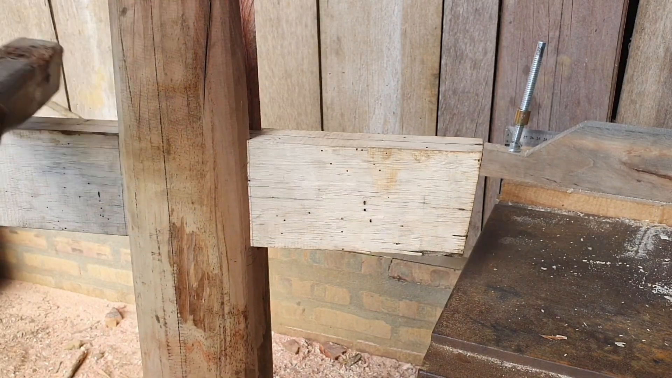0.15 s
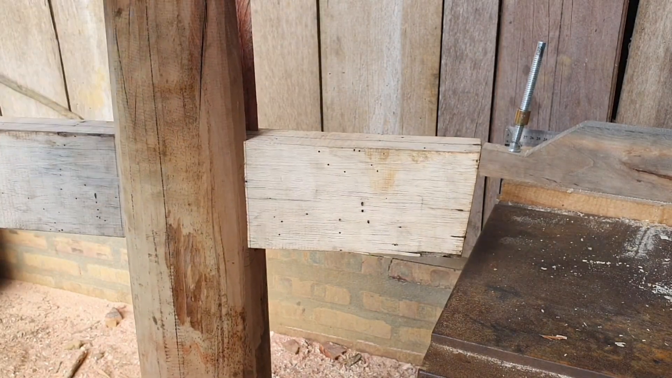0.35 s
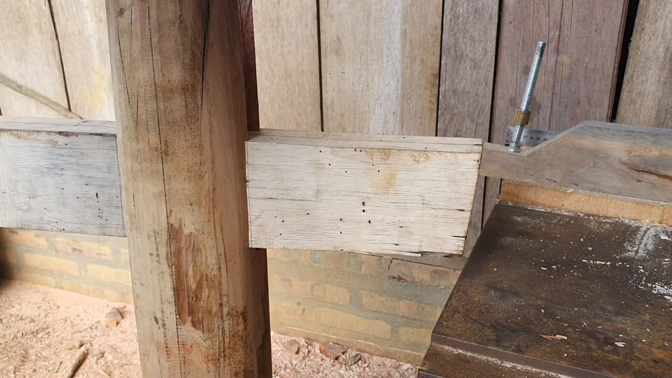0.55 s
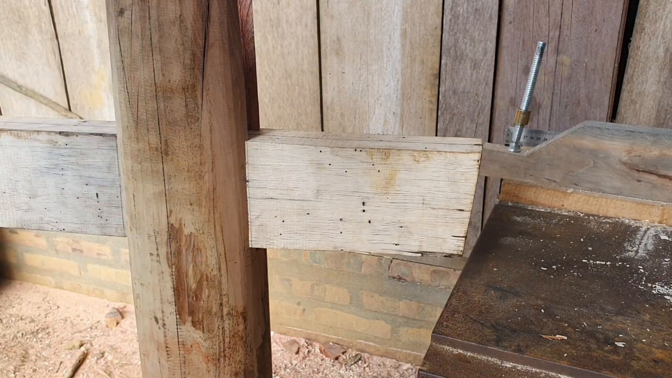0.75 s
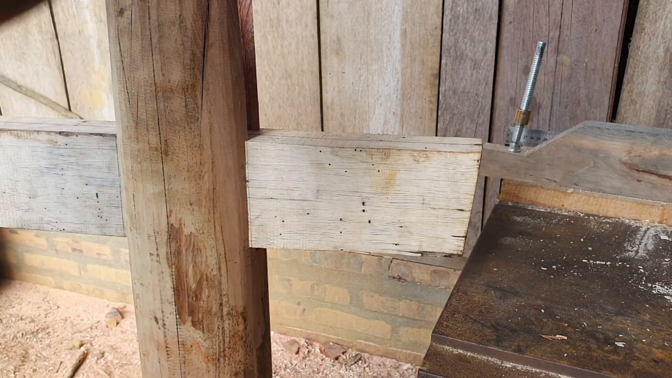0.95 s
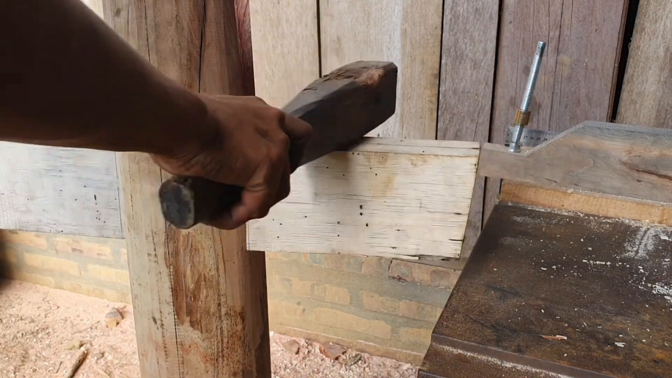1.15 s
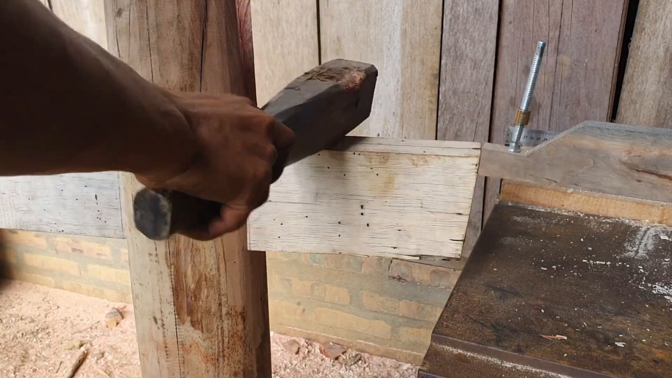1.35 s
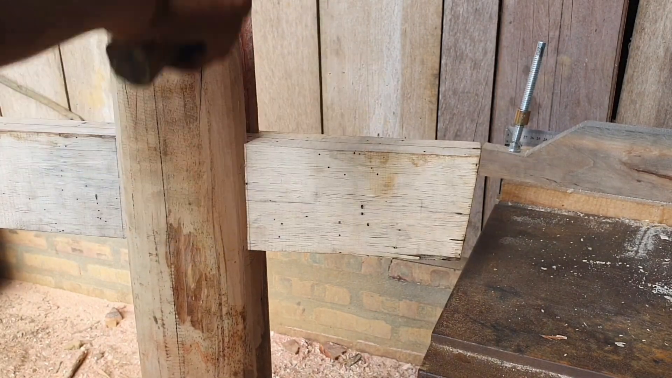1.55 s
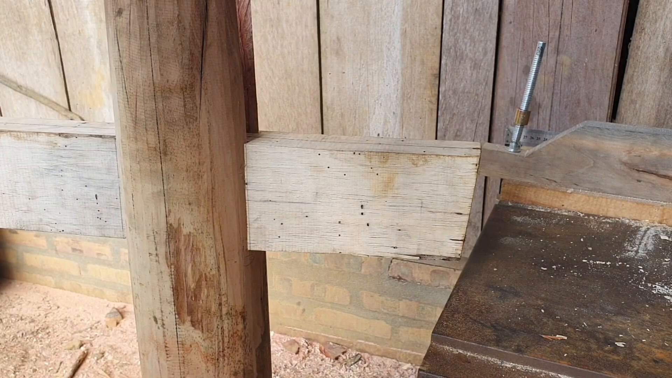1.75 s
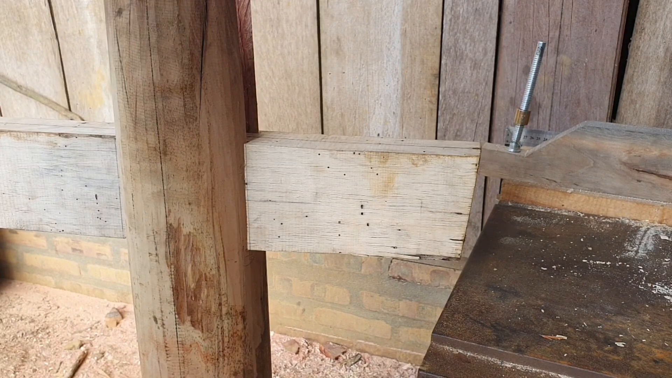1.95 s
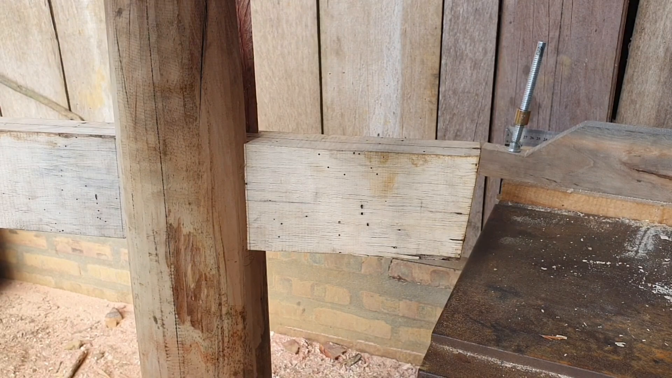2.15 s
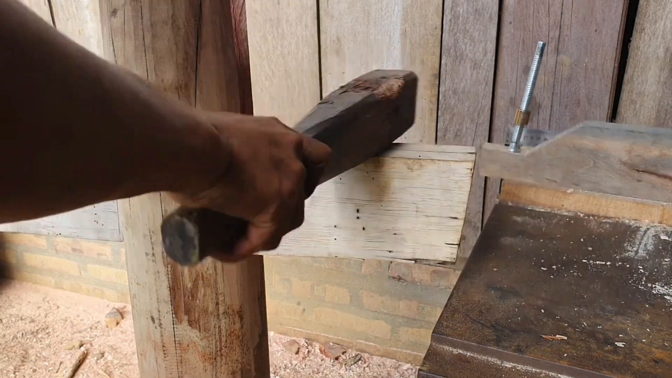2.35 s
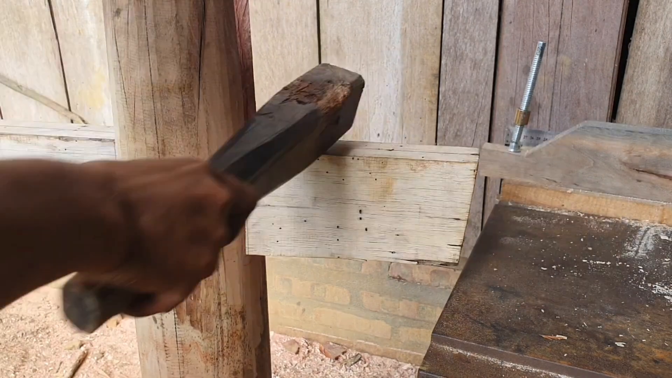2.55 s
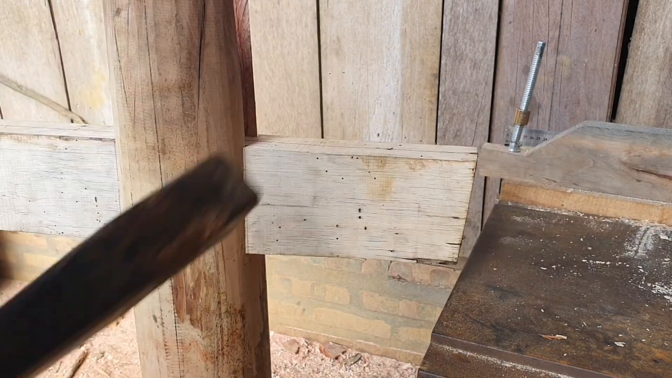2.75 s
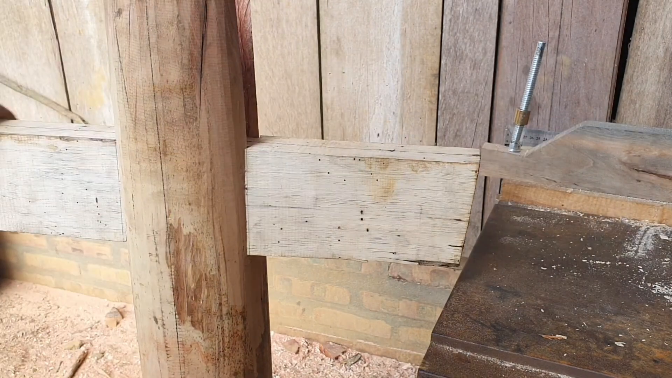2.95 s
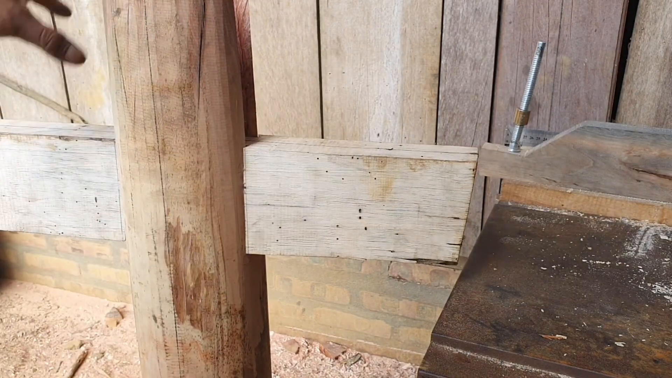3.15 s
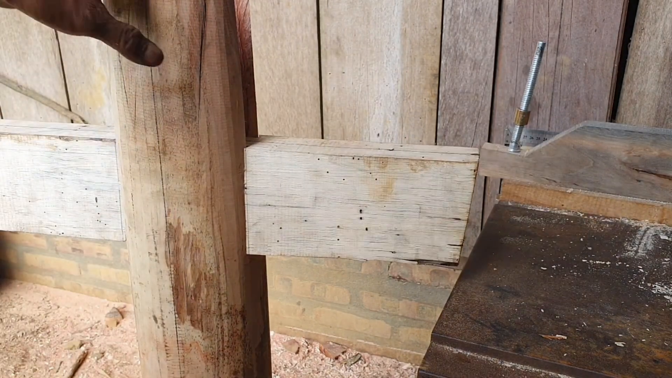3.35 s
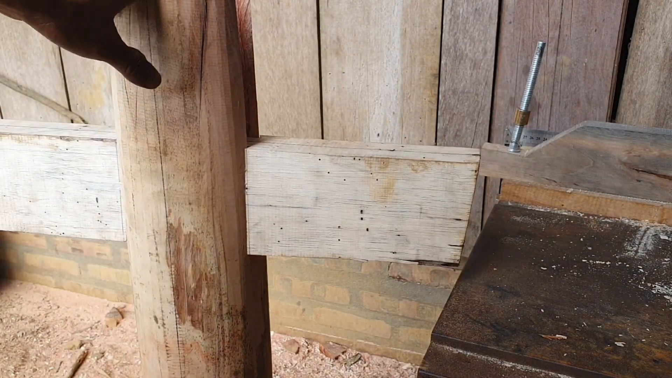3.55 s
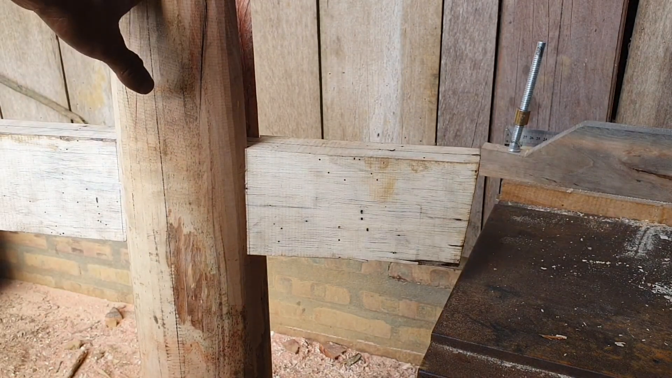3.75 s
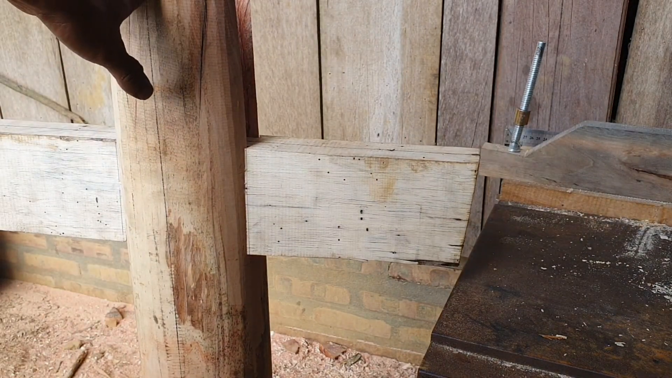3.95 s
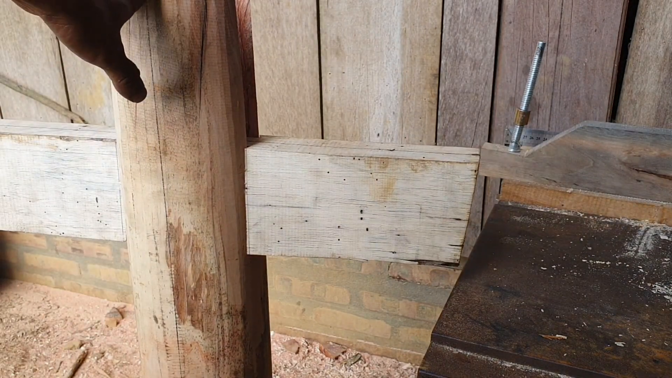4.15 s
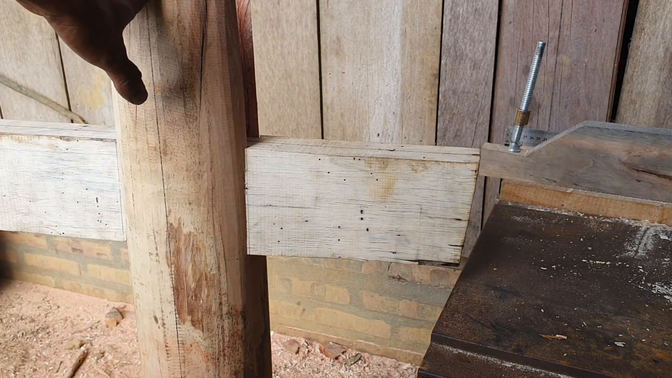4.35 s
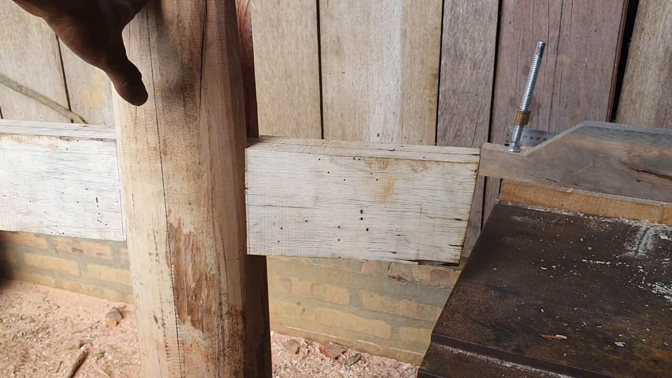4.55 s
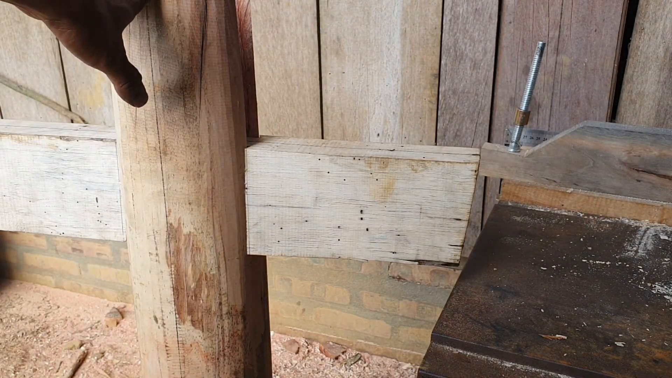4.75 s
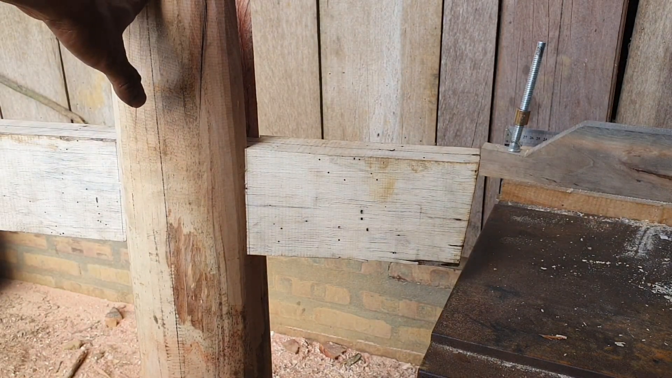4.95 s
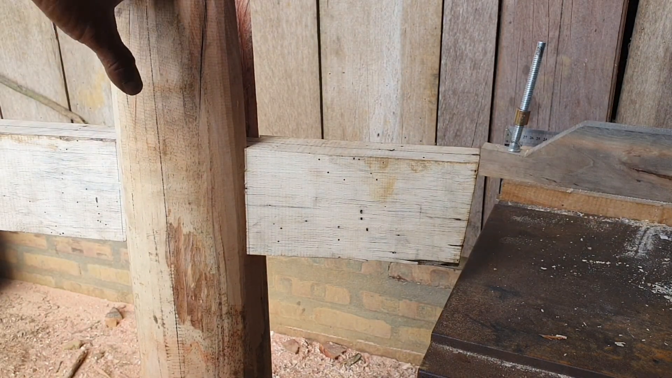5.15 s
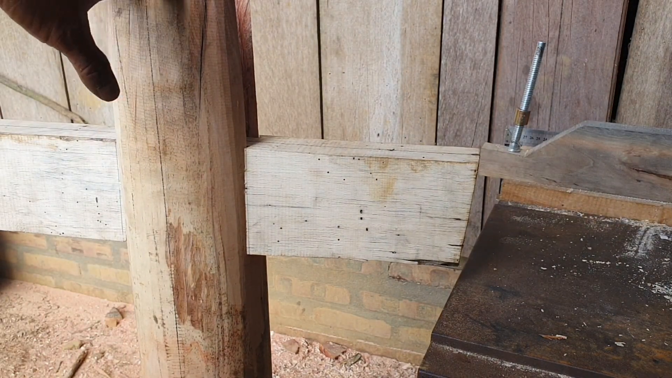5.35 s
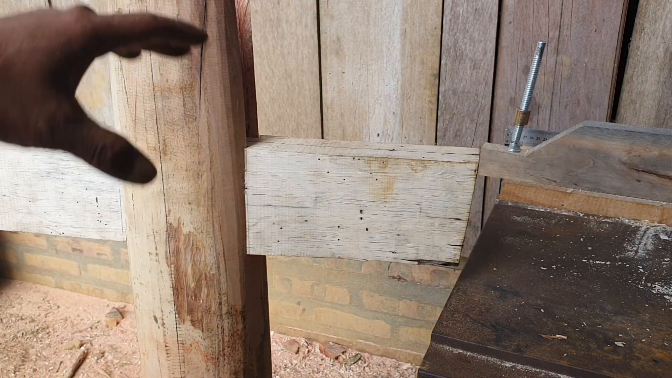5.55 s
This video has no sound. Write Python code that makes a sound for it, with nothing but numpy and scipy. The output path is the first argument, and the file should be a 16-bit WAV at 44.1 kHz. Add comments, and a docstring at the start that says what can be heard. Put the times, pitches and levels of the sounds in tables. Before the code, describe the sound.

Three loud wood-on-wood knocks, the first more hollow and lower, the next two brighter and harder, land a little over a second apart. A plank wall hums low beneath them and slowly dies away. Then only a brief scrape and faint dull bumps from the worker remain, over soft open air, a barely audible insect and distant chirping birds, in stereo at close range.

```python
"""A wooden mallet drives a notched beam onto a post: three hard blows, one left of the post, two right of it.
Each blow sums ringing beam modes, a mallet clack and a contact pulse, then gets the work shed's echoes.
The plank wall shudders in slow beating modes, also from an earlier blow; the loose beam rebounds softly.
Shaped noise makes the scuffs and bumps of the worker shifting about and taking hold of the post.
Behind are distant bird chirps (gliding sines), a far insect (pulsed band noise) and open-air noise."""
import sys
import numpy as np
from scipy import signal
from scipy.fft import rfft, irfft
from scipy.io import wavfile

SR = 44100
rng = np.random.default_rng(int(sys.argv[2]) if len(sys.argv) > 2 else 0)


def materialize(psi):
    """Save the field psi as 16-bit PCM at rate SR to the path in sys.argv[1].

    A 1-D psi becomes a single channel; in a 2-D psi each row is a channel.
    """
    bounded = np.clip(np.atleast_2d(psi).T, -1, 1)
    quanta = np.round(bounded * 32767).astype(np.int16)
    wavfile.write(sys.argv[1], SR, quanta)


N = 246519

# Open-air spectrum. Each row: frequency in Hz, relative density in dB per Hz.
AIR_SPECTRUM = [(20, -16.5), (50, -2.5), (72, -1), (110, -12), (170, -16), (400, -23.5), (560, -21.5),
                (1100, -29), (1800, -34.5), (3200, -34.5), (4200, -37), (7200, -39.5), (8300, -57),
                (12000, -52.5), (15500, -53.5)]
# Bird chirps. Each row: start in seconds, nominal top pitch in Hz, relative level in dB.
BIRD_CHIRPS = [(0.44, 4100, -64), (1.54, 4390, -61), (1.85, 3500, -60.5), (1.952, 3710, -61.5),
               (2.11, 3926, -56.5), (2.755, 4190, -65), (3.89, 4245, -58.5), (4.51, 4350, -59),
               (4.547, 3410, -61.5), (4.66, 3620, -63), (4.772, 4390, -56.5), (5.045, 3750, -61.5),
               (5.2, 3350, -66.5), (5.422, 4330, -56)]
# Worker's scuffs and bumps. Each row: start in seconds, time before dying away in seconds, level in dB,
# weight from 0 (light scrape) to 1 (dull bump).
WORKER_SCUFFS = [(1.128, .06, -57.5, 0.068), (2.216, .15, -64, .26), (3.066, .08, -64, .2),
                 (3.297, 0.051, -47, .19), (3.33, .17, -53, 0.69), (4.0, .2, -68, 0.57),
                 (4.189, .045, -61.5, 0.46), (4.733, 0.12, -62, .54), (4.87, .09, -61, 0.94),
                 (5.016, .075, -55.5, 1), (5.4, 0.17, -65, .31)]
# Light scrape spectrum. Each row: frequency in Hz, relative density in dB per Hz.
SCRAPE_SPECTRUM = [(60, -14), (250, 4), (600, 2.5), (900, 0), (1600, -2), (3500, -6), (6000, -21.5),
                   (9000, -28.5), (15000, -27.5)]
# Dull bump spectrum. Each row: frequency in Hz, relative density in dB per Hz.
BUMP_SPECTRUM = [(40, -10), (90, 1), (145, 7), (230, 2), (340, 0), (520, -13), (1200, -31), (4000, -41.5),
                 (15000, -57.5)]
# Plank wall and frame modes. Each row: nominal frequency in Hz, T60 in seconds, relative level in dB.
WALL_MODES = [(47.2, 1.1, -3.5), (55.3, 0.7, -2.5), (61.5, 0.3, 0), (70.2, .6, 10.5), (74.5, 0.27, -5.5),
              (54.6, 3.6, -13.5), (64.7, 7, -20.5), (69.8, 5.7, -19.5)]
# Loose beam rebounding in its notch. Each row: start in seconds, pitch in Hz, T60 in seconds, level in dB.
BEAM_REBOUNDS = [(.128, 344, 0.32, -35.5), (1.238, 431, 0.14, -25), (2.443, 441, 0.055, -12)]
# Near surfaces. Each row: left-ear delay in seconds, level re direct sound in dB,
# lag of the right ear in seconds (the right delay is the absolute value of the sum).
NEAR_ECHOES = [(.0008, -2, -0.013), (.0034, -0.5, -0.0021), (.0047, -6, -0.0014), (.0062, -11.5, 0.0014),
               (.0118, -6.5, -0.0077), (.0185, -8.5, -0.0054), (.031, -10, -0.012)]
# Decay of the shed's long tail. Each row: frequency in Hz, T60 in seconds.
SHED_DECAY = [(100, 1.5), (300, 0.59), (700, 0.6456), (1500, 0.6927), (3000, 0.5239), (6000, 0.4063),
              (10000, 0.326), (15000, 0.27)]
# Colour of the shed's long tail. Each row: frequency in Hz, relative level in dB.
SHED_TAIL_COLOUR = [(100, 4), (400, 5), (1000, -5.5), (2500, -6), (6000, -4.5), (14000, 0)]
# Beam and mallet modes. Each row: frequency in Hz, T60 in seconds,
# relative level in dB when struck left, relative level in dB when struck right.
TIMBER_MODES = [(344.5, .35, -19.5, -32.5), (416, .08, -15.5, -17), (649.3, 0.13, 2.5, -16),
                (715, .05, -1.5, -22.5), (1028, 0.029, -3, -5), (1004, .08, -2, -11.5),
                (1324, .06, -4.5, 3), (1366, .05, -5, 5), (1484, 0.087, -14, 3), (1585, 0.12, -3.5, -2.5),
                (1974, .07, -5.5, -18.5), (2056, 0.16, -4, -14), (2430, 0.12, -18, -21.5),
                (2617, 0.22, -12.5, -13), (2855, 0.068, -11.5, -10)]
# Mallet head's own clack. Each row: frequency in Hz, T60 in seconds, relative level in dB.
MALLET_MODES = [(1072, .016, -1), (1307.6, .016, 1), (2014, 0.0083, -4.5)]
# Dull push and crack of wood on wood. Each row: frequency in Hz, relative density in dB per Hz.
CONTACT_SPECTRUM = [(30, -13.5), (120, -8), (280, -16), (500, -2), (1000, -1), (1600, 3), (2400, -5.5),
                    (3600, -10.5), (5500, -10), (7200, -16), (9000, -26.5), (15000, -22)]
# Mallet blows. Each row: start in seconds, relative level in dB, place from 0 (left of the post) to 1 (right),
# relative crack level in dB, relative wall shudder in dB.
MALLET_BLOWS = [(0.09, 0, 0, -4, -2.5), (1.2071, 0.5, 0.82, -10, 1.5), (2.3848, 3, 1, -4, 1.5)]

# Open air: level at the start, growth, drift depth.
WASH_DB, WASH_GROWTH_DB_PER_S, WASH_DRIFT_DB = -68.5, 0.73, 1
# Far insect: band centre, level, nominal pulse rate, swing each way per pulse.
INSECT_HZ, INSECT_DB, INSECT_PULSES_PER_S, INSECT_SWING_DB = 4110, -87, 17, 6
# Chirp: length, share of it spent lifting, first and last pitch as shares of the top.
CHIRP_S, LIFT_SHARE, START_PITCH, END_PITCH = .09, .27, .86, .71
# Scuff: linear rise, decay of a pure scrape and of a pure bump.
SCUFF_RISE_S, SCRAPE_T60_S, BUMP_T60_S = 0.022, .7, .35
# Earlier blow, its shudder still dying away: time before the start, relative level.
EARLIER_S, EARLIER_DB = 1.06, 1
BAND_EDGE_HZ = 15750


def amp(db):
    """Decibels to gain."""
    return 10 ** (np.asarray(db) / 20)


def unit(x):
    """Scale to a mean energy of one per channel."""
    return x / np.sqrt(np.mean(np.sum(x ** 2, -1)) + 1e-20)


def read(points, hz):
    """Interpolate a table linearly over log frequency."""
    point_hz, value = np.transpose(points)
    return np.interp(np.log(hz + 1), np.log(point_hz), value)


def add(mix, start_s, sound):
    """Lay a sound into the mix at start_s, cut at the end of the mix."""
    part = mix[:, round(start_s * SR):][:, :sound.shape[-1]]
    part += sound[..., :part.shape[1]]


def noise(colour_db, size, alike):
    """Stereo noise of RMS one, coloured by colour_db(hz); the bass is near mono."""
    hz = np.fft.rfftfreq(size, 1 / SR)
    mid, side = rfft(rng.standard_normal((2, size)))
    side = side * (1 - alike) * hz / (hz + 250)
    left_right = np.array([mid + side, mid - side])
    return unit(irfft(left_right * amp(colour_db(hz)), size)) * np.sqrt(size)


def drift(per_s):
    """Slow chance: per_s new Gaussian values a second, joined by straight lines."""
    return np.interp(np.arange(N) / SR * per_s, np.arange(1000), rng.standard_normal(1000))


def air(drift_per_s=3):
    """Open-air wash: coloured noise with slight level drift and slow growth."""
    wash = noise(lambda hz: read(AIR_SPECTRUM, hz), size=N, alike=0.22)
    growth_db = WASH_GROWTH_DB_PER_S * np.arange(N) / SR
    return wash * amp(WASH_DB + growth_db + WASH_DRIFT_DB * drift(drift_per_s))


def insect(width_hz=150, uneven=0.28, swell_db=2.5):
    """Far insect: a thin noise band pulsing at a loose rate, with slow swells."""
    band = noise(lambda hz: -20 * np.log10(1 + ((hz - INSECT_HZ) / width_hz) ** 2), size=N, alike=0)
    pulses_per_s = INSECT_PULSES_PER_S * (1 + uneven * drift(10))
    pulses = np.sin(2 * np.pi * np.cumsum(pulses_per_s) / SR)
    return band * amp(INSECT_DB + INSECT_SWING_DB * pulses + swell_db * drift(2.2))


def chirp(top_hz, db, waver=.025, overtone_db=-19):
    """Wavering whistle that lifts to its top and slurs down, with a weak octave above."""
    u = np.linspace(0, 1, round(CHIRP_S * SR))
    wobble = np.interp(u, np.linspace(0, 1, 40), rng.standard_normal(40))
    lifting = np.maximum(1 - u / LIFT_SHARE, 0)
    falling = np.maximum((u - LIFT_SHARE) / (1 - LIFT_SHARE), 0)
    glide = 1 - (1 - START_PITCH) * lifting ** 2 - (1 - END_PITCH) * falling ** 1.1
    phase = 2 * np.pi * np.cumsum(top_hz * glide * (1 + waver * wobble)) / SR
    whistle = np.sin(phase) + amp(overtone_db) * np.sin(2 * phase)
    return amp(db) * np.sin(np.pi * u ** 1.4) * whistle


def birds(bird_db=-3, direct_db=-6, faint_db=-80, yard_t60_s=.22, count=18):
    """Chirps blurred by a decaying-noise reverb; fainter, higher random ones join towards the end."""
    song = np.zeros((2, N))
    faint = [(3.6 + 1.9 * a, 5000 + 2000 * b, faint_db + 5 * c) for a, b, c in rng.random((count, 3))]
    for start_s, top_hz, db in BIRD_CHIRPS + faint:
        add(song, start_s, chirp(top_hz, db))
    t = np.arange(SR // 2) / SR
    yard = unit(rng.standard_normal((2, len(t))) * amp(-60 * t / yard_t60_s))
    blurred = signal.fftconvolve(song, yard, axes=1)[:, :N]
    return amp(bird_db) * (amp(direct_db) * song + blurred)


def scuff(hold_s, db, weight, grain_db=2):
    """Rubbing that catches and slips; more weight makes it duller and quicker to die away."""
    t = np.arange(SR) / SR
    rub = noise(lambda hz: (1 - weight) * read(SCRAPE_SPECTRUM, hz) + weight * read(BUMP_SPECTRUM, hz),
                size=SR, alike=.25)
    catches = np.interp(t, np.linspace(0, 1, 150), rng.standard_normal(150))
    t60_s = (1 - weight) * SCRAPE_T60_S + weight * BUMP_T60_S
    decay_db = -60 * np.maximum(t - hold_s, 0) / t60_s
    return rub * np.minimum(t / SCUFF_RISE_S, 1) * amp(db + grain_db * catches + decay_db)


def shudder(wall_db=-31, rise_s=0.023):
    """A blow sets the plank wall and frame swaying in close, beating, slightly detuned modes."""
    t = np.arange(N) / SR
    sway = 0
    for k, (hz, t60_s, db) in enumerate(WALL_MODES):
        detuned_hz = hz * (1 + 0.018 * rng.standard_normal())
        sway = sway + amp(db - 60 * t / t60_s) * np.sin(2 * np.pi * detuned_hz * t + k * np.pi / 2)
    return amp(wall_db) * sway * (1 - np.exp(-(t / rise_s) ** 2))


def rebound(hz, t60_s, db, rise_s=0.0073):
    """Soft, hollow second knock in the joint: one decaying sine with a gentle onset."""
    t = np.arange(SR // 2) / SR
    return amp(db - 60 * t / t60_s) * (1 - np.exp(-t / rise_s)) * np.sin(2 * np.pi * hz * t)


def shed_tail():
    """Diffuse reflections: coloured noise, each band dying at its own speed."""
    hz, t, bands = signal.stft(noise(np.zeros_like, size=SR, alike=0), SR, nperseg=256)
    bands = bands * amp(read(SHED_TAIL_COLOUR, hz)[:, None] - 60 * t / read(SHED_DECAY, hz)[:, None])
    diffuse = signal.istft(bands, SR, nperseg=256)[1][:, :SR]
    return unit(diffuse * (1 - np.exp(-np.arange(SR) / SR / .008)))


def shed(near_db=-1, near_t60_s=0.22, far_db=-5, ear_lag_s=.00025):
    """Impulse response: direct sound, single echoes off post and wall, quick scatter, long tail."""
    t = np.arange(SR) / SR
    taps = np.zeros((2, SR))
    for delay_s, db, lag_s in NEAR_ECHOES:
        taps[0, round(delay_s * SR)] += amp(db)
        taps[1, abs(round((delay_s + lag_s) * SR))] += amp(db)
    taps = signal.lfilter([.5, .5], [1], taps)  # rough boards dull each echo
    taps[0, 0] += 1
    taps[1, round(ear_lag_s * SR)] += 1
    scatter = noise(np.zeros_like, size=SR, alike=0) * amp(-60 * t / near_t60_s)
    scatter = unit(scatter * (1 - np.exp(-t / 0.018)))
    return taps + amp(near_db) * scatter + amp(far_db) * shed_tail()


def contact_pulse(size):
    """Wood-on-wood contact: a causal minimum-phase pulse with the contact spectrum."""
    log_gain = np.log(amp(read(CONTACT_SPECTRUM, abs(np.fft.fftfreq(size, 1 / SR)))))
    return unit(np.fft.ifft(np.exp(np.conj(signal.hilbert(log_gain)))).real)


def beam(t, place):
    """Decaying timber modes, weighted by where the mallet lands."""
    ring = 0
    for k, (hz, t60_s, left_db, right_db) in enumerate(TIMBER_MODES):
        polarity_turns = k % 2 / 2  # every other mode is inverted
        mode = unit(amp(-60 * t / t60_s) * np.sin(2 * np.pi * (hz * t + polarity_turns)))
        ring = ring + amp(left_db + place * (right_db - left_db)) * mode
    return unit(ring)


def mallet_head(t):
    """Short clack of the mallet head: quickly decaying cosine modes."""
    return unit(sum(amp(db - 60 * t / t60_s) * np.cos(2 * np.pi * hz * t) for hz, t60_s, db in MALLET_MODES))


def knock(place, crack_db, knock_db=19):
    """One blow: beam modes, mallet clack and contact pulse, sounding in the shed."""
    t = np.arange(SR // 2) / SR
    wood = beam(t, place) + mallet_head(t) + amp(crack_db) * contact_pulse(len(t))
    return amp(knock_db) * unit(signal.fftconvolve(wood[None], shed(), axes=1))


def scene():
    """Background, worker, rebounds, wall and blows in one mix."""
    mix = air() + insect() + birds()
    for start_s, *settings in WORKER_SCUFFS:
        add(mix, start_s, scuff(*settings))
    add(mix, 0, amp(EARLIER_DB) * shudder()[round(EARLIER_S * SR):])
    for start_s, *settings in BEAM_REBOUNDS:
        add(mix, start_s, rebound(*settings))
    for start_s, db, place, crack_db, wall_db in MALLET_BLOWS:
        add(mix, start_s, amp(wall_db) * shudder())
        add(mix, start_s, amp(db) * knock(place, crack_db))
    return mix


def record(dry):
    """Round off the loudest peaks at full scale, then low-pass."""
    rounded = dry / (1 + dry ** 4) ** .25
    low_pass = signal.firwin(511, BAND_EDGE_HZ, window=("kaiser", 9), fs=SR)
    return signal.oaconvolve(rounded, low_pass[None], "same")


dry = scene()
out = record(dry)
materialize(out)
```